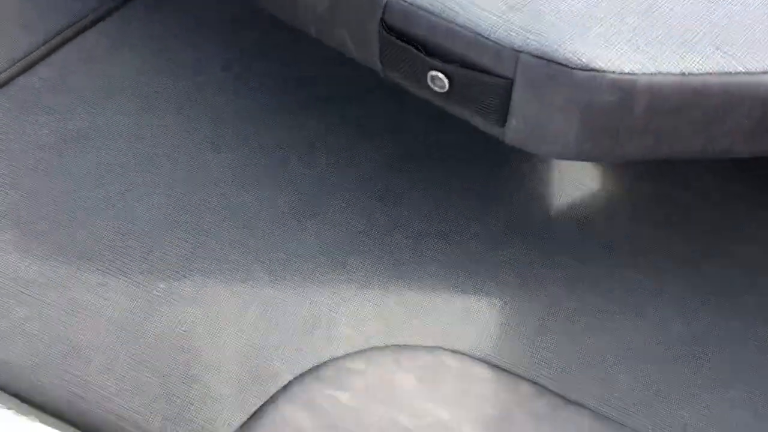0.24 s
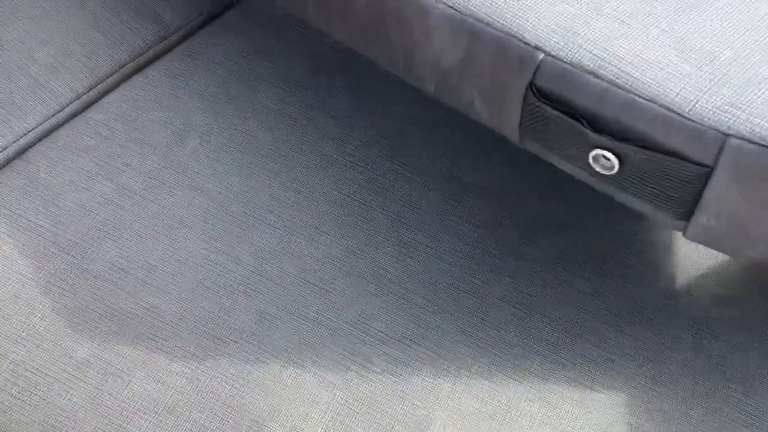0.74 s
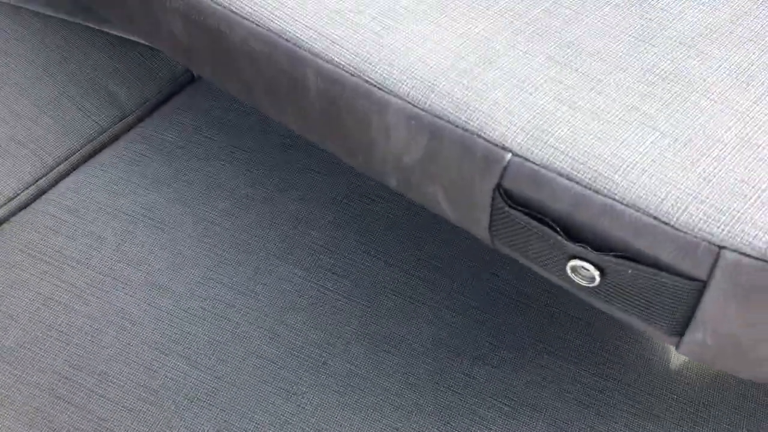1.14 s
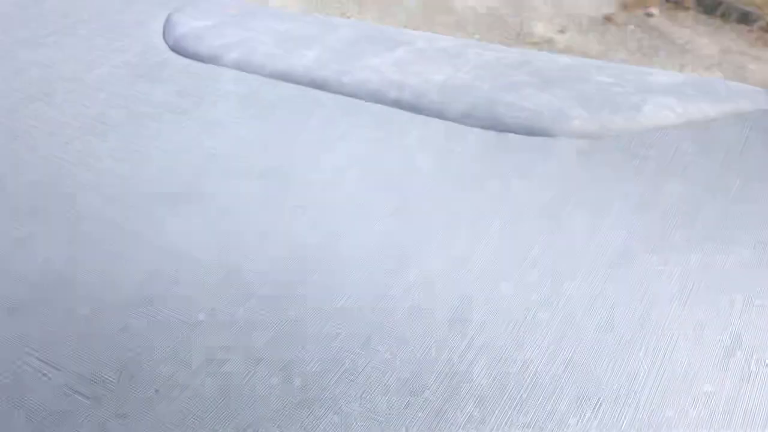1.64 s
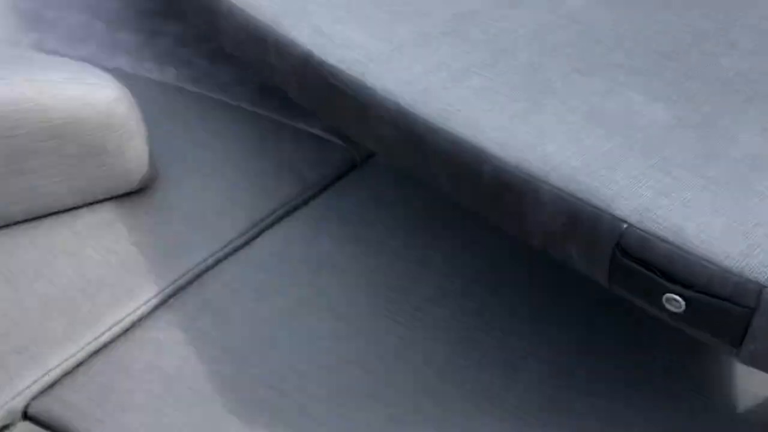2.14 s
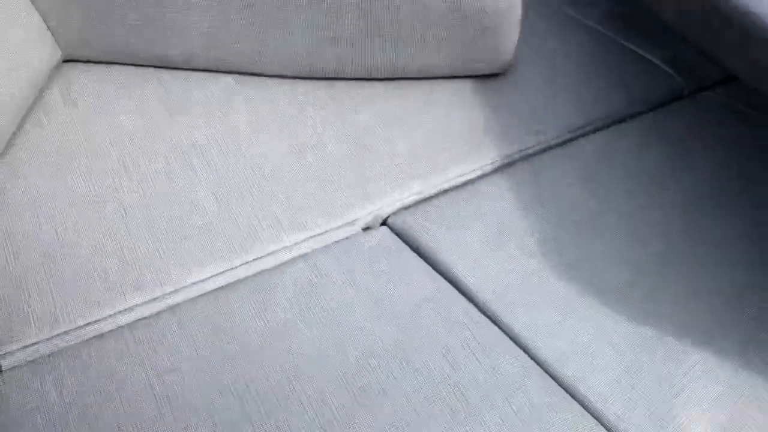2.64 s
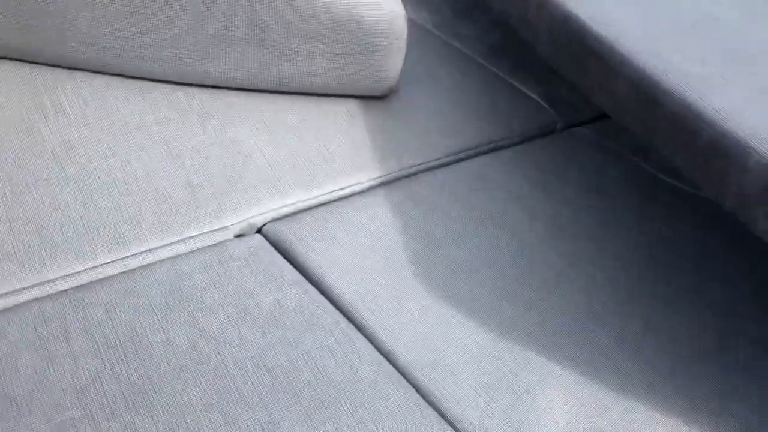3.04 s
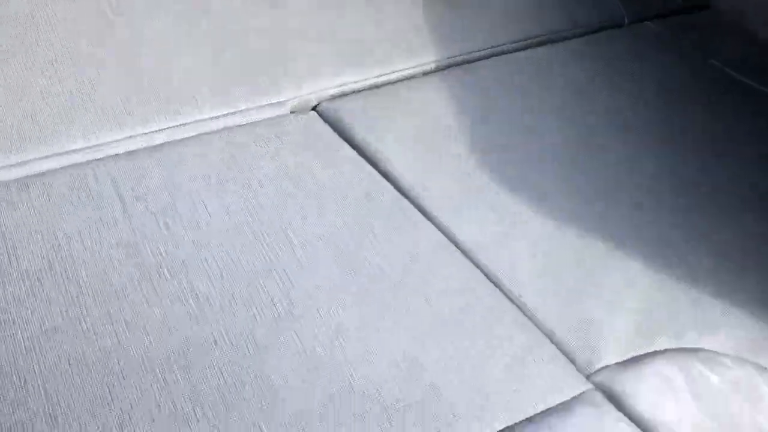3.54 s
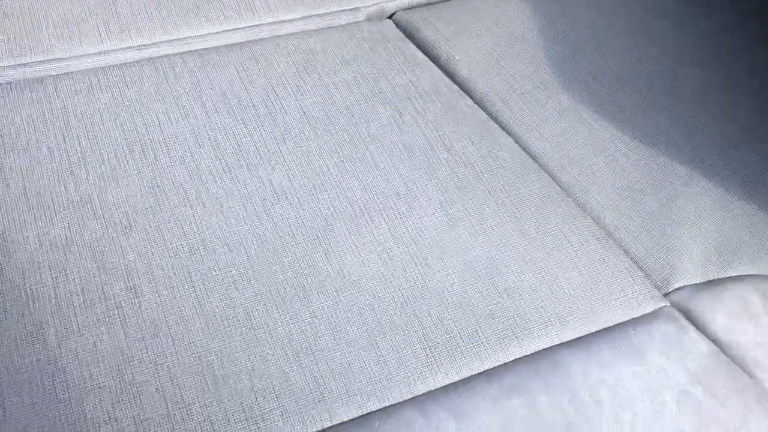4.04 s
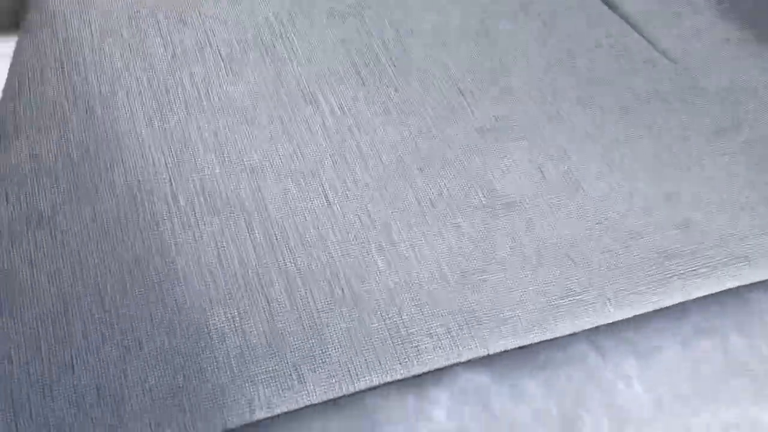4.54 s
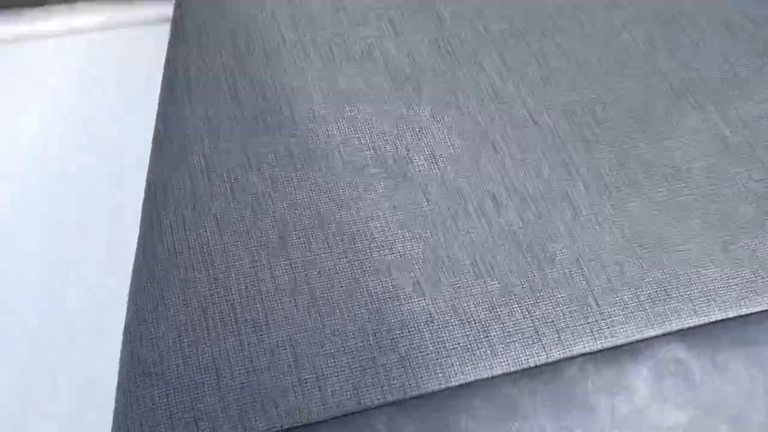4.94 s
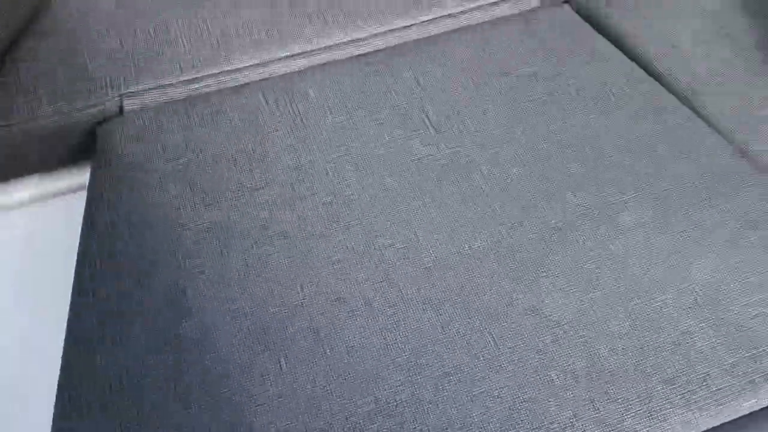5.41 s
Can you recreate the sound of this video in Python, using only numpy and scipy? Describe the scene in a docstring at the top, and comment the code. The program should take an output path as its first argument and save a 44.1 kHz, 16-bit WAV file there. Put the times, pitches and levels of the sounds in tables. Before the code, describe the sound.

A padded boat hatch lid drops with a hollow boom, then a fastener snaps, another lid clacks shut, and cushions knock softly.

```python
"""Padded hatch lids are handled close by on a boat deck. First a metal fastener snaps, then a lid drops
and bounces, booming over its hollow locker. Fabric is brushed and rustles, a fastener snaps loudly,
and another lid clacks shut with a bright rattle. After that come small cushion knocks, more brushing
and two soft footsteps that flex the deck. A faint outdoor rush goes on from start to end."""
import sys
import numpy as np
from scipy import signal
from scipy.fft import rfft, irfft, next_fast_len
from scipy.io import wavfile
from scipy.ndimage import map_coordinates

SR = 44100
rng = np.random.default_rng(int(sys.argv[2]) if len(sys.argv) > 2 else 0)


def transcribe(u):
    """Save the signal u as a 16-bit wav file named by the first command-line argument.

    u: samples, shape (n,) or (channels, n), limited to [-1, 1]; the rate is SR.
    q: integer samples, one column per channel.
    """
    v = np.clip(np.atleast_2d(u).T, -1, 1)
    q = np.round(v * 32767).astype(np.int16)
    wavfile.write(sys.argv[1], SR, q)


N = 250091
T = np.arange(SR) / SR  # one second of time after a hit

# Levels in tone and noise tables are relative; a decay is the time taken to fade by 60 dB.
# tones of the lid over its locker: f/Hz, level/dB, decay/s
LID_TONES = [(50, -8.5, 0.39), (67.05, -2, 0.4), (77.3, -14, 0.45), (121, 8, 0.097), (145, -4, 0.097),
             (210, -12, 0.13), (247, -13, 0.1), (316, -30, 0.065)]
# noise of a slapping rim or deck panel: f/Hz, level/dB
SLAP_NOISE = [(100, 3), (200, 4), (300, 1.5), (450, -6), (680, -4), (950, -11.5), (1200, -13),
              (1700, -20.5), (4000, -22.5), (7500, -21), (11000, -25), (14000, -41), (16000, -51)]
# noise of the loose lid shuddering: f/Hz, level/dB
SHUDDER_NOISE = [(30, 0), (50, 0), (110, 0), (180, 14), (250, -1), (380, -26), (800, -34), (2000, -47.5)]
# fasteners snap: t/s, level/dB, pitch factor, scrape level/dB, scrape decay/s
SNAPS = [(0.3265, -18, 0.71, -41.5, .059), (0.3478, -22, 0.77, -41.5, .01),
         (1.6454, -26.5, 1.1, -32.5, .02), (1.6475, 1, 1.007, -23.5, .014), (1.6508, -17, 0.76, -35, .006)]
# tones of a fastener's metal stud at pitch factor 1: f/Hz, level/dB, decay/s
STUD_TONES = [(6780, -18.5, 0.00159), (8360, -10, 0.001793), (9610, -1.5, 0.0024), (11510, -11.5, .0024)]
# tones of the stud's socket: f/Hz, level/dB, decay/s
SOCKET_TONES = [(678.5, -21.5, 0.0079), (1649, -22, 0.0046), (2430, -16.5, 0.0062), (2950, -27, 0.0045)]
# noise of the stud scraping in its socket: f/Hz, level/dB
SCRAPE_NOISE = [(100, -0.5), (700, 6), (1200, -3.5), (1850, -9), (2400, 3), (3600, 1.5), (5000, -2.5),
                (9000, -4.5), (12000, -6.5), (14000, -17.5), (16000, -31.5)]
# a lid clacks shut: t/s, knock level/dB, rattle level/dB, rattle's upper edge f/Hz
CLACKS = [(1.8377, -24.5, -39, 10700), (1.8445, -57, -30, 7840), (1.8655, -35, -25, 15000)]
# tones of that lid's frame: f/Hz, level/dB, decay/s
FRAME_TONES = [(64.3, -2, 0.25), (115.7, -12, 0.42), (184, -1, 0.086), (219, 6.5, 0.039),
               (170.3, -12.5, 0.34), (235, -23, 0.19), (419, -7, 0.065), (576, -11.5, 0.09),
               (640, -4.5, .05), (1030, -4.5, 0.033), (2010, -16, 0.061), (2380, -31, .12),
               (2660, -33, 0.08)]
# noise of its rattling fittings: f/Hz, level/dB
RATTLE_NOISE = [(200, 2), (500, -8.5), (800, -11), (1100, -13.5), (1450, -7.5), (1800, -12), (2100, -7),
                (2800, -7), (3400, -14), (4800, -10.5), (7200, -3), (8700, -7), (10300, -5), (12400, -13),
                (14000, -23), (16000, -26)]
# feet land on the deck: t/s, thud level/dB, slap level/dB
STEPS = [(3.354, -24, -57), (4.3129, -19, -40)]
# tones of the locker after a step: f/Hz, level/dB, decay/s
LOCKER_TONES = [(65.2, -19.5, 0.64), (133.3, -24.5, 0.21)]
# cushions knock against their frames: t/s, level/dB, treble level/dB, hollow note f/Hz
KNOCKS = [(2.031, -48, -22, 232), (2.094, -61, 10, 199), (3.334, -47, -21, 263), (4.5152, -46, -9, 1326),
          (4.543, -53, -1, 1860), (4.5952, -37.5, 7, 810), (4.653, -47, -3, 1390), (5.333, -51, -1, 1800),
          (5.528, -53.5, -4, 442)]
# noise of a cushion's puff: f/Hz, level/dB
PUFF_NOISE = [(60, -17), (250, -13), (390, 7), (560, 0.5), (780, -2), (1150, -7.5), (1400, -5.5),
              (1900, -15.5), (4000, -16.5), (7000, -19), (11000, -26.5), (16000, -51)]
# tones of the board under a cushion: f/Hz, level/dB, decay/s
SEAT_TONES = [(387.5, -5.5, 0.16), (812, -9.5, 0.17), (957, 0, 0.045), (1414, -15, 0.1)]
# the fabric is brushed: middle t/s, level/dB, half length/s
BRUSHES = [(0.922, -67.5, .028), (1.042, -68, 0.019), (1.724, -66.5, 0.099), (2.03, -71.5, 0.042),
           (3.331, -69, 0.043), (4.583, -64.5, 0.06), (5.054, -64, 0.048), (5.599, -67.5, 0.037)]
# noise of woven fabric: f/Hz, level/dB
CLOTH_NOISE = [(1500, -15), (4000, -10), (7000, -6.5), (10000, -2.5), (12000, -5.5), (14000, -17.5),
               (16000, -23)]
# low outdoor rumble: f/Hz, level/dB
RUMBLE_NOISE = [(12, -9), (25, 3.5), (50, 5.5), (85, 2.5), (130, -4.5), (200, -11.5), (300, -30.5),
                (600, -45)]
# distant rush: f/Hz, level/dB
RUSH_NOISE = [(120, 0), (300, -1.5), (450, -2), (700, 0.5), (1200, -3.5), (1600, -11.5), (2200, -18.5),
              (4000, -25.5), (9000, -46.5)]
# how the rush rises and falls: t/s, relative level/dB
RUSH_LEVELS = [(0.0, -64.5), (0.57, -63), (1.07, -65), (2.08, -63), (2.43, -64.5), (2.81, -61), (3.32, -63),
               (3.54, -61.5), (4.22, -62), (5.32, -62), (5.67, -58.5)]
# even background hiss: f/Hz, level/dB
HISS_NOISE = [(500, 6.5), (2500, 0.5), (5000, -1), (9000, -1.5), (13000, -4.5), (16000, -7.5)]


def dropped_lid(landings=5):
    """Each landing booms in the locker, shakes the lid and slaps the rim; bounces get softer and duller."""
    out, s = np.zeros(N), .5185
    rock_s, flight_s, flight_shrink = .0755, .0295, .36  # hops shrink until the lid rocks on its padding
    boom_db, slap_db, loss_db, dulling_db = -11, -30.5, 7.5, 2  # the last two are lost with each bounce
    for k in range(landings):
        boom = -ring(LID_TONES) * rise(0.01)
        shudder = amp(-26) * noise(SHUDDER_NOISE, SR) * fade(0.51)
        low, high = split(noise(SLAP_NOISE, SR), hz=2000)
        contact = 1 + amp(-15) * fade(0.026)  # the first milliseconds are the hardest
        slap = (low * fade(0.21) + amp(-dulling_db * k) * high * fade(.13)) * contact
        add(out, s, amp(boom_db - loss_db * k) * (boom + shudder))
        add(out, s + .001, amp(slap_db - loss_db * k) * slap)  # the rim meets just after the padding
        s += rock_s + flight_s * flight_shrink ** k
    return out


def fasteners():
    """A stud rings, clacks and scrapes in its socket, taps the padding and settles with faint ticks."""
    out = np.zeros(N)
    tap_hz, tick_gap_s = 160, .0068
    for s, db, pitch, scrape_db, scrape_decay_s in SNAPS:
        clack = amp(1.3 * db) * ring(SOCKET_TONES)  # grows faster than the stud's ring in a hard snap
        scrape = amp(scrape_db) * noise(SCRAPE_NOISE, SR) * fade(scrape_decay_s)
        tap = ring([(tap_hz, -23.5 + 0.443 * db, 0.01)])
        add(out, s, amp(db) * stud(pitch) + clack + scrape + tap)
        for delay in np.cumsum(tick_gap_s * (.5 + rng.random(size=4))):
            add(out, s + delay, amp(db - 36.5) * stud(pitch=1.08))
    return out


def stud(pitch):
    """A small metal stud rings for a few milliseconds."""
    click, _ = split(ring(STUD_TONES, pitch), hz=12500 * pitch)  # a slower hit is duller
    return split(click, hz=3200 * pitch)[1]  # a small part gives off little bass


def shut_lid():
    """The lid's frame knocks, and its fittings chatter in a bright, dense rattle."""
    out = np.zeros(N)
    dying = fade(0.079) + amp(-18.5) * fade(0.218)  # a quick drop, then a quiet tail
    for s, knock_db, rattle_db, edge_hz in CLACKS:
        chatter, _ = split(noise(RATTLE_NOISE, SR), edge_hz)
        rattle = chatter * dying * rise(0.00037)
        knock = -ring(FRAME_TONES) * rise(0.0015)
        add(out, s, amp(rattle_db) * rattle + amp(knock_db) * knock)
    return out


def footsteps():
    """The deck flexes about twice under a foot; its panel slaps lightly and the locker hums faintly."""
    out = np.zeros(N)
    flex_hz, peak_s, width_s = 53, .014, .012
    flex = -np.sin(2 * np.pi * flex_hz * T) * np.exp(-((T - peak_s) / width_s) ** 2)
    for s, thud_db, slap_db in STEPS:
        thud = flex + ring(LOCKER_TONES)
        slap = noise(SLAP_NOISE, SR) * fade(0.066)
        add(out, s, amp(thud_db) * thud + amp(slap_db) * slap)
    return out


def cushions():
    """A padded knock puffs, rings the seat board and sounds one short hollow note."""
    out = np.zeros(N)
    for s, db, treble_db, note_hz in KNOCKS:
        low, high = split(noise(PUFF_NOISE, SR), hz=1630)
        puff = low * fade(0.094 * 2 ** ((db + 50) / 10))  # a knock 10 dB stronger puffs twice as long
        note_db = 11.5 - 3.5 * np.log2(note_hz / 250)  # higher notes are quieter
        note = ring([(note_hz, note_db, 0.037)])
        edge_hz = 3600 * 2 ** (treble_db / 9)  # a softer hit is duller
        body, _ = split(puff + note + ring(SEAT_TONES), edge_hz)
        crack = amp(treble_db) * high * fade(0.13)
        add(out, s, amp(db) * (body + crack) * rise(0.0001))
    return out


def fabric():
    """Woven fabric hisses with each brush stroke and rustles at random as a cushion is lifted."""
    strokes = sum(amp(db) * swell(s, half_s) for s, db, half_s in BRUSHES) * noise(CLOTH_NOISE, N)
    rustle = amp(-76 + 4 * wobble(33)) * swell(middle_s=1.3, half_s=0.43) * noise(CLOTH_NOISE, N)
    catching = unit(amp(1.48 * wobble(90) + 3.2 * wobble(640)))  # the threads catch unevenly
    return (strokes + rustle) * catching


def outdoors():
    """A low rumble, a distant rush that wavers and slowly grows, and an even hiss."""
    times, levels = np.transpose(RUSH_LEVELS)
    rush_db = np.interp(np.arange(N) / SR, times, levels) + 2.5
    rumble = amp(-54 + 1.3 * wobble(8)) * noise(RUMBLE_NOISE, N)
    rush = amp(rush_db + .6 * wobble(8.5)) * noise(RUSH_NOISE, N)
    hiss = amp(-69.5) * noise(HISS_NOISE, N)
    return rumble + rush + hiss


def amp(db):
    """Turn decibels into a number to multiply by."""
    return 10 ** (np.asarray(db) / 20)


def unit(x):
    """Scale to an average strength (rms) of 1."""
    return x / np.sqrt(np.mean(x ** 2) + 1e-20)


def rise(rise_s):
    """Climb from 0 towards 1, about two thirds of the way after rise_s."""
    return 1 - np.exp(-T / rise_s)


def fade(decay_s):
    """Die away, 60 dB down after decay_s."""
    return np.exp(-np.log(1000) * T / decay_s)


def swell(middle_s, half_s):
    """Grow and sink again in a bell shape."""
    return np.exp(-((np.arange(N) / SR - middle_s) / half_s) ** 2 / 2)


def wobble(rate):
    """A smooth curve through `rate` random values a second."""
    return map_coordinates(rng.standard_normal(int(N * rate / SR) + 4), [np.arange(N) * rate / SR])


def filtered(x, gain_at):
    """Turn each frequency in x up or down by gain_at(hz)."""
    size = next_fast_len(len(x) + SR // 4)
    return irfft(rfft(x, size) * gain_at(np.fft.rfftfreq(size, 1 / SR)), size)[:len(x)]


def noise(shape, size):
    """Noise of strength 1, shaped by rows of f/Hz, level/dB."""
    f, db = np.transpose(shape)
    gain_at = lambda hz: amp(np.interp(np.log(hz + 1), np.log(f), db))
    return unit(filtered(rng.standard_normal(size), gain_at))


def split(x, hz):
    """The parts of x below and above a frequency."""
    low = signal.sosfilt(signal.butter(2, hz, fs=SR, output="sos"), x)
    high = signal.sosfilt(signal.butter(2, hz, "high", fs=SR, output="sos"), x)
    return low, -high


def ring(tones, pitch=1):
    """The fading tones of a struck object, at slightly new strengths each time."""
    return sum(amp(db + .5 * rng.standard_normal()) * fade(decay_s) * np.sin(2 * np.pi * hz * pitch * T)
               for hz, db, decay_s in tones)


def add(track, s, sound):
    """Mix a sound into the track, starting at s seconds."""
    part = track[round(s * SR):][:len(sound)]
    part += sound[:len(part)]


def scene():
    """Everything on deck, heard in the open air on one channel."""
    return (dropped_lid() + fasteners() + shut_lid() + footsteps() + cushions() + fabric() + outdoors())[None]


def record(dry):
    """Round off the sharpest peaks, cut the highest treble and add a small constant offset."""
    ceiling, top_hz, offset = .88, 15900, .0075
    rounded = dry[0] / (1 + (dry[0] / ceiling) ** 6) ** (1 / 6)
    return filtered(rounded, lambda hz: hz < top_hz)[None] + offset


dry = scene()
out = record(dry)
transcribe(out)
```